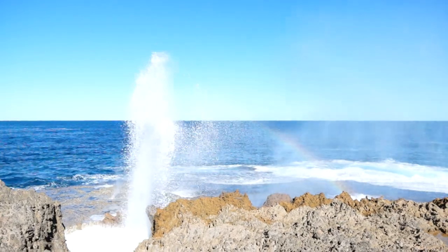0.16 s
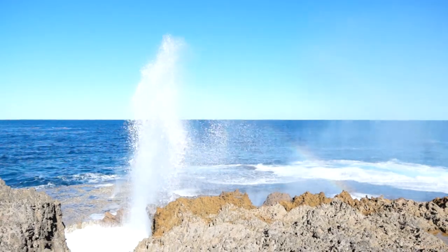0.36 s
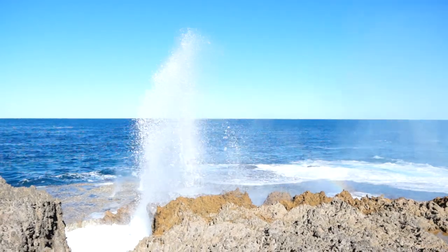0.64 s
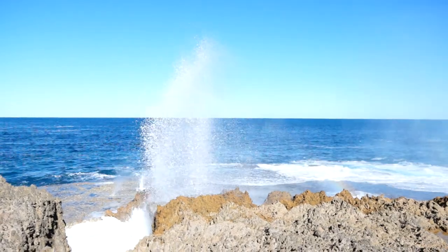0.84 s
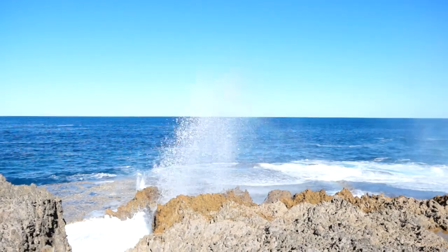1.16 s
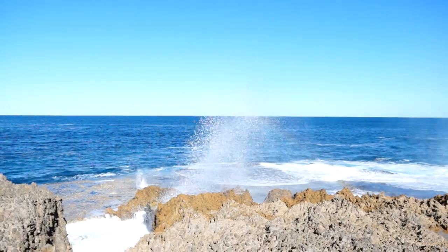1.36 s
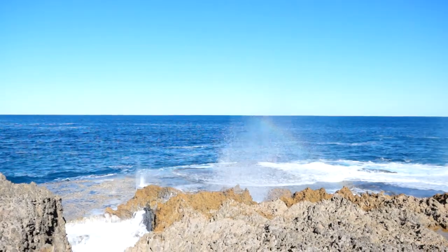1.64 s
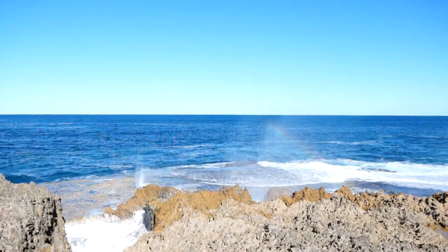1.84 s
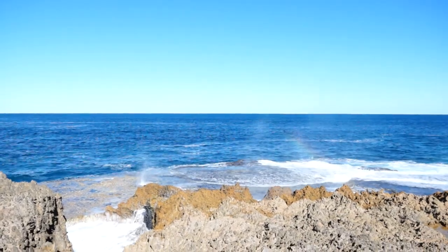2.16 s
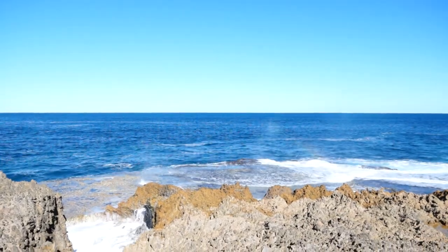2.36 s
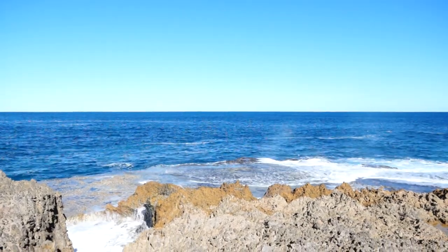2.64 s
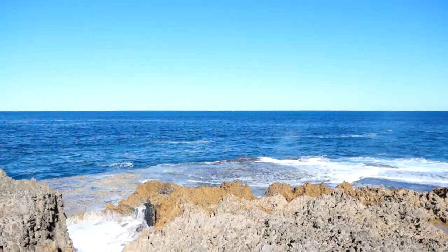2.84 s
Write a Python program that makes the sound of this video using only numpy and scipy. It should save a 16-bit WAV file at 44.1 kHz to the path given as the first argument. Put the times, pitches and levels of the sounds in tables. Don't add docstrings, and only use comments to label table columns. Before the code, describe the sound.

Gusty wind batters a small camera microphone on a rocky coast, fluttering, thudding and crackling throughout; blowhole spray hisses faintly behind it, fading by two seconds, over steady far surf.

```python
import sys
import numpy as np
from scipy import signal
from scipy.fft import rfft, irfft, next_fast_len
from scipy.io import wavfile
from scipy.ndimage import uniform_filter1d

SR = 44100
rng = np.random.default_rng(int(sys.argv[2]) if len(sys.argv) > 2 else 0)


def gain_from_db(level_db):
    decades = np.asarray(level_db, float) / 20
    return 10 ** decades


def file_out(sig):
    cols = np.atleast_2d(sig).T
    lim = np.clip(cols, -1, 1)
    pcm = np.round(lim * 32767).astype(np.int16)
    wavfile.write(sys.argv[1], SR, pcm)


N = 132741


def rms_one(x):
    return x / np.sqrt(np.mean(x ** 2) + 1e-20)


def db_mean(db):
    return 10 * np.log10(np.mean(gain_from_db(db) ** 2))


def in_time(rows):
    s, *columns = np.transpose(rows)
    return [np.interp(np.arange(N) / SR, s, c) for c in columns]


def at_hz(points, hz):
    table_hz, value = np.transpose(points)
    return np.interp(np.log(np.maximum(hz, 1)), np.log(table_hz), value)


def drift(rate_hz):
    pole = np.exp(-16 * np.pi * rate_hz / SR)
    noise = rng.standard_normal(N // 8 + 4002)
    slow = signal.lfilter([1], [1, -2 * pole, pole * pole], noise)[4000:]
    return np.interp(np.arange(N) / 8, np.arange(len(slow)), rms_one(slow - slow.mean()))


def shaped(x, response):
    size = next_fast_len(N + 4096)
    return irfft(rfft(x, size) * response(np.fft.rfftfreq(size, 1 / SR)), size)[..., :N]


def grains(rate_per_s, spread_db):
    size_db = spread_db * np.minimum(rng.exponential(1, N), 4)
    sizes = gain_from_db(size_db) * rng.choice([-1, 1], N)
    return rms_one(sizes * (rng.random(N) < rate_per_s / SR))


def bandpass(order, low_hz, high_hz):
    return signal.butter(order, [low_hz, high_hz], "band", fs=SR, output="sos")


# (frequency [Hz], density [dB per Hz])
SURF_COLOUR = [(100, -43), (400, 14.5), (1500, 0), (3500, -9), (5000, -37), (15000, -38)]


def surf():
    wash = shaped(rng.standard_normal((2, N)), lambda hz: gain_from_db(at_hz(SURF_COLOUR, hz)) * (hz > 60))
    return gain_from_db(-42 + 0.59 * drift(1.0)) * rms_one(wash)


# (time [s], level [dB])
JET_LEVEL = [(0.0, -60), (.17, -60), (.2, -56.5), (.215, -62.5), (.51, -58.5), (.87, -59), (1.395, -59),
             (1.425, -64.5), (1.89, -68), (1.99, -71.5), (2.04, -73), (2.15, -88), (2.5, -83),
             (3.01, -77.5)]
# (frequency [Hz], density [dB per Hz])
SPRAY_COLOUR = [(300, -12), (1500, 19), (3700, 10), (5200, 12.5), (6500, 12.5), (8300, 7.5), (10500, 0),
                (15800, -1.5)]
# (frequency [Hz], difference [dB])
SPRAY_LEAN = [(3000, 1.5), (5000, -1), (6500, -2), (9000, -1.5), (13000, 1.3), (15500, 0.78)]
# (frequency [Hz], density [dB per Hz])
MIST_COLOUR = [(300, 15), (3500, 11.5), (5100, -1), (6500, 4.5), (8000, 0), (11000, -0.5), (15800, -7)]


def spray():
    level_db, = in_time(JET_LEVEL)
    drops = grains(rate_per_s=2100, spread_db=15.0)
    raw = rng.standard_normal((3, N)) + gain_from_db(-18.5) * drops
    echo_s, notch_hz, notch_width_hz, notch_turn_rad = 0.00018, 5030, 600, -2.5

    def jet_side(side, echo_gain):
        def response(hz):
            colour = gain_from_db(at_hz(SPRAY_COLOUR, hz) + side * at_hz(SPRAY_LEAN, hz) / 2) * (hz > 200)
            echo = 1 - echo_gain * np.exp(-2j * np.pi * hz * echo_s)
            turn_rad = side * notch_turn_rad / 2 * np.exp(-((hz - notch_hz) / notch_width_hz) ** 2)
            return colour * echo * np.exp(1j * turn_rad)
        return shaped(raw[0], response)

    jet = np.array([jet_side(1, 0.45), jet_side(-1, 0.42)])
    mist = shaped(raw[1:], lambda hz: gain_from_db(at_hz(MIST_COLOUR, hz)) * (hz > 200))
    hiss = rms_one(jet) + gain_from_db(-3) * rms_one(mist)
    return gain_from_db(level_db + 13.5 + drift(4.3)) * hiss


# (time [s], peak [dB])
SPIKES = [
    (2.104, -42),
    (2.1447, -51),
    (2.1871, -47),
    (2.2579, -50),
    (2.3682, -51),
    (2.4824, -55),
    (2.5178, -57),
    (2.5373, -56),
]


def spikes():
    s, db = np.transpose(SPIKES)
    clicks = np.full(N, 1e-18)
    clicks[(s * SR).astype(int) + 40] += gain_from_db(db + 15) * rng.choice([-1, 1], len(s))
    return signal.sosfilt(bandpass(1, 5000, 9000), clicks)


# (time [s], half length [s], lift [dB], extra lift above 1 kHz [dB])
PUFFS = [(0.06, 0.0059, 3.5, 2.5), (0.128, 0.009, 2.5, -5), (0.157, 0.0096, -3, -8),
         (0.21, 0.0068, 0.7, -2), (0.293, 0.013, 4, -2), (0.335, 0.018, -4, -3), (0.365, 0.0053, 5, -11),
         (0.471, 0.0053, 2, 7), (0.479, 0.0055, -7.5, -4), (0.544, 0.02, 3.5, 2), (0.584, 0.011, -8.5, -10),
         (0.627, 0.007, -2.7, -9), (0.646, 0.0055, 2, 1), (0.705, 0.0044, 4.5, 0),
         (0.766, 0.021, -2.5, 4.5), (0.846, 0.0079, -7, -7), (0.875, 0.0047, 4, 6.5),
         (0.896, 0.0068, -5, -4), (0.943, 0.0056, 2, 7), (0.978, 0.009, -3.7, 0), (1.139, 0.006, -1, -10),
         (1.17, 0.006, 2.3, 4.5), (1.202, 0.0073, 3.5, 3), (1.273, 0.0059, -11.5, 10),
         (1.305, 0.016, 0.5, 0.5), (1.362, 0.0055, -8.5, 3), (1.414, 0.025, 0.7, 5.5),
         (1.528, 0.036, 2.3, 1.2), (1.622, 0.015, -3, -2), (1.69, 0.017, 1, -5.8), (1.773, 0.029, 1.1, 3),
         (1.834, 0.016, 2.5, -1), (1.898, 0.009, -2, 3.5), (2.091, 0.009, -3, 1.5), (2.105, 0.0053, 6.5, 3),
         (2.193, 0.011, 3.1, -1.5), (2.26, 0.045, 0, 0.5), (2.346, 0.0046, -2.5, -1),
         (2.408, 0.035, 1.2, -4.3), (2.432, 0.0076, -5, 1), (2.471, 0.0055, -2, -3.5),
         (2.491, 0.0051, -1.2, 3.5), (2.63, 0.012, 3, 0), (2.651, 0.0039, 0.3, 7.5),
         (2.81, 0.027, -0.3, -5), (2.886, 0.0056, 5, 6.5), (2.91, 0.011, -4.5, -1.5),
         (2.931, 0.0071, 2, -5), (2.984, 0.0052, 2.9, 4.5), (3, 0.0057, -7.5, -1)]


def puffs():
    s, half_s, lift_db, bright_db = np.transpose(PUFFS)
    coarse = np.arange(0, N, 32)
    bumps = np.exp(-.5 * ((coarse[:, None] / SR - s) / half_s) ** 2)
    return [np.interp(np.arange(N), coarse, bumps @ c) for c in (lift_db, bright_db)]


# (time [s], peak [dB], pitch [Hz])
TICKS = [(0.088, -22, 3100), (0.2214, -43, 2900), (0.2574, -38, 3600), (0.318, -31, 3500),
         (0.4005, -32.5, 3500), (0.4314, -30, 2800), (0.4695, -34.5, 3500), (0.9204, -30, 3600),
         (1.0067, -25, 3400), (1.0362, -24, 3200), (1.0598, -28.5, 3400), (1.1029, -25.5, 4200),
         (1.1669, -32.0, 4000), (1.18, -29, 3800), (1.2069, -26.5, 3200), (1.2376, -38, 4300),
         (1.3301, -27.5, 4100), (1.3768, -27.5, 3700), (1.4113, -29, 3200), (1.418, -25, 3800),
         (1.555, -28, 3400), (1.5833, -31.5, 4000), (1.635, -30.5, 4200), (1.6807, -28.5, 3700),
         (1.727, -26.5, 3900), (1.7549, -32, 4000), (1.7882, -35, 3100), (1.8054, -34, 3200),
         (1.8378, -35, 3200), (1.8753, -34.0, 4000), (1.8813, -34.0, 3300), (1.9095, -30.0, 3700),
         (1.937, -36, 3200), (1.9663, -42, 3100), (2.0081, -40, 3200), (2.0754, -37, 2800),
         (2.0815, -33.0, 3200), (2.105, -26, 3800), (2.1771, -37, 3700), (2.1879, -31, 3500),
         (2.214, -35, 3500), (2.2484, -37, 3500), (2.2858, -44.5, 3300), (2.318, -43, 3500),
         (2.3403, -30, 3200), (2.3704, -31, 3600), (2.3884, -36, 2900), (2.4436, -36, 3400),
         (2.487, -42, 3500), (2.5251, -33.0, 3100), (2.5366, -25.5, 3400), (2.5486, -32.5, 3400),
         (2.6291, -48, 3500), (2.6496, -48, 2900), (2.726, -38, 2900), (2.7485, -38.5, 3400),
         (2.8036, -38, 3000), (2.8833, -47, 2900), (2.948, -41.0, 3400), (2.9748, -50, 2800)]
TICK_GAIN_DB = 3.5


def ticks():
    out, half = np.zeros(N + SR), 128
    t = np.arange(-half, half) / SR
    phases = rng.uniform(0, 2 * np.pi, (len(TICKS), 2))
    for (s, db, hz), (body_rad, edge_rad) in zip(TICKS, phases):
        wave = np.cos(2 * np.pi * hz * t + body_rad)
        wave = wave + gain_from_db(-25) * np.cos(4 * np.pi * hz * t + edge_rad)
        envelope = np.exp(-.5 * (t * hz / 0.85) ** 2)
        start = int(s * SR) - half
        out[start:start + len(t)] += gain_from_db(db + TICK_GAIN_DB) * wave * envelope
    return out[:N]


def crackle():
    s, db, _ = np.transpose(TICKS)
    coarse, width_s = np.arange(0, N, 16), 0.0026
    bumps = np.exp(-.5 * ((coarse[:, None] / SR - s) / width_s) ** 2)
    swell = bumps @ gain_from_db(db - 15 + TICK_GAIN_DB)
    band = bandpass(2, 1960, 5630)
    fizz = signal.sosfilt(np.vstack([band, band]), grains(rate_per_s=2500, spread_db=5.9))
    return np.interp(np.arange(N), coarse, swell) * rms_one(fizz)


def lump_swing():
    return 2.3 * np.tanh((0.17 * drift(12) + 0.51 * drift(71) + 1.3 * drift(260)) / 2.6)


def even_bass(bass):
    even_s, share = .06, .7
    power = uniform_filter1d(uniform_filter1d(bass[0] ** 2, int(even_s * SR)), int(even_s * SR / 2))
    return bass * (power.mean() / power) ** (share / 2)


def even_body(body):
    even_s, share = 0.026, 0.7
    swing = uniform_filter1d(body[0] ** 2, int(even_s * SR)) ** (share / 2)
    return body * swing.mean() / uniform_filter1d(swing, int(even_s * SR / 2))


# (time [s], level [dB], sharpness [dB per octave])
GUST = [(0.0, -21.5, -1.5), (.08, -22, -1.5), (.3, -23, -1.07), (.56, -25.5, -4), (.6, -24.5, -1.5),
        (.81, -29.5, -3.5), (.87, -20.5, -4), (1.08, -20, -0.86), (1.2, -24, -1.4), (1.275, -25, -5.5),
        (1.33, -20.5, -1.3), (1.61, -24, .3), (1.7, -21.5, 0), (2.33, -22, 0.55), (2.45, -23.5, -2.5),
        (2.54, -23, 0.2), (2.9, -28.5, -3.5), (2.97, -24.5, -2)]
# (frequency [Hz], density [dB per Hz])
WIND_COLOUR = [(25, -34), (60, -29), (134, -13), (276, -3), (648, -0.5), (1150, -8.5), (1870, -19.5),
               (3600, -26.5), (7500, -49.5), (12000, -76)]


def turbulence():
    level_db, sharp_db = in_time(GUST)
    lift_db, bright_db = puffs()
    lumps, fine = lump_swing(), lump_swing()
    white = rfft(rng.standard_normal((3, N)))
    eddies = rfft(np.array([grains(1200 * gain_from_db(2.5 * lumps), spread_db=3) for _ in range(3)]))
    hz = np.fft.rfftfreq(N, 1 / SR)
    place = 2 * np.log2(np.maximum(hz, 1) / 400)
    colour = gain_from_db(at_hz(WIND_COLOUR, hz))
    bass, body = 0, 0
    for k in range(-9, 12):
        octave = k / 2
        above = np.clip(octave, 0, 4.0)
        eddy_share = gain_from_db(-5.5 + 3.5 * octave)
        mask = colour * np.cos(np.pi / 2 * np.clip(place - k, -1, 1)) ** 2
        band = irfft(mask * (white + eddy_share * eddies) / np.sqrt(1 + eddy_share ** 2), N)
        turn = np.clip(0.18 * (octave - 1), 0, np.pi / 2)
        lump = np.cos(turn) * lumps + np.sin(turn) * fine
        swing_db = (2.0 + 0.43 * above) * lump + 1.07 * drift(28.0)
        tilt_db = sharp_db * (np.clip(octave, -.8, 4.0) + np.exp(-2 * (octave - 1.26) ** 2))
        puff_db = bright_db * np.clip(above - .7, 0, 1)
        band = band * gain_from_db(swing_db - db_mean(swing_db) + tilt_db + puff_db)
        if k > -4:
            body = body + band
        else:
            bass = bass + band
    out = even_bass(bass) + gain_from_db(lift_db) * even_body(body)
    return gain_from_db(level_db) * out / np.sqrt(np.mean(out[0] ** 2))


# (frequency [Hz], lead [rad])
WIND_TURN = [(60, -0.3), (200, 0.14), (500, -1.22), (860, -1.53), (1500, -2.04), (3600, -2), (7000, -1.5)]
# (frequency [Hz], difference [dB])
WIND_LEAN = [(100, 2.5), (300, -0.5), (1300, 2), (3000, 3), (6000, 6)]
# (frequency [Hz], share [dB])
WIND_OWN = [(25, 13.5), (60, -3.5), (200, -6.5), (600, -13.5), (1200, -4.5), (4000, -24), (9000, -12)]


def wind():
    flow = turbulence()
    shared = flow[0] + ticks() + crackle()

    def heard(side):
        return shaped(shared, lambda hz: gain_from_db(side * at_hz(WIND_LEAN, hz) / 2)
                      * np.exp(.5j * side * at_hz(WIND_TURN, hz)))

    own = shaped(flow[1:], lambda hz: gain_from_db(at_hz(WIND_OWN, hz)))
    return np.array([heard(1), heard(-1)]) + own


def scene():
    return surf() + spray() + spikes() + wind()


def band_limit(x):
    return signal.sosfilt(signal.butter(12, 15780, fs=SR, output="sos"), x)


def record(dry):
    cut = signal.sosfilt(signal.butter(2, 121, "high", fs=SR, output="sos"), dry)
    hiss = signal.lfilter([.5], [1, -.5], rng.standard_normal(dry.shape))
    mix = cut + gain_from_db(-68) * hiss
    return band_limit(0.89 * np.tanh(mix / 0.71))


dry = scene()
out = record(dry)
file_out(out)
```